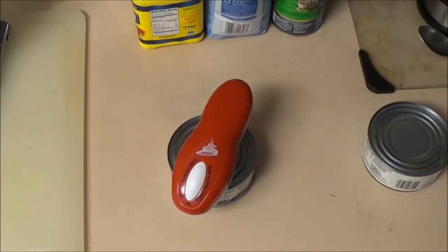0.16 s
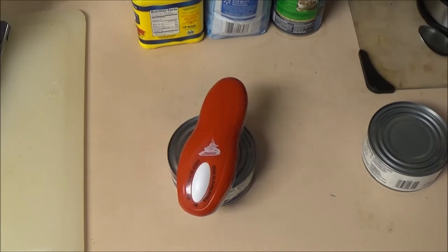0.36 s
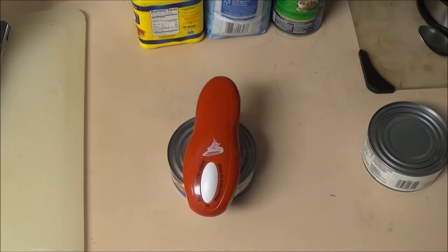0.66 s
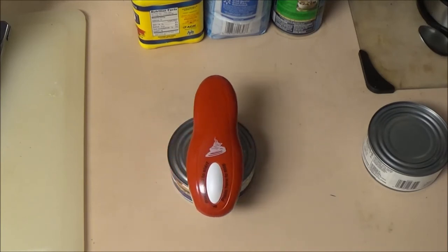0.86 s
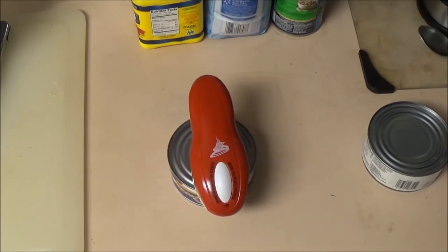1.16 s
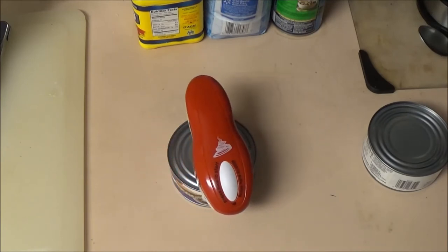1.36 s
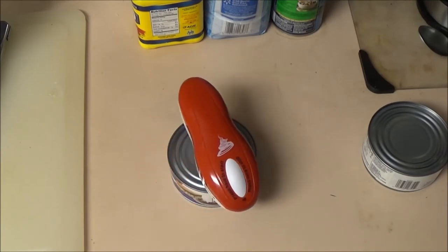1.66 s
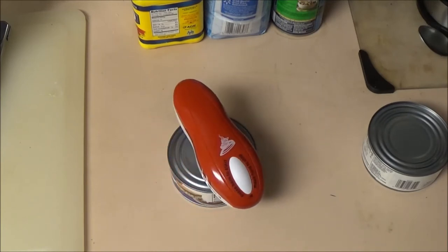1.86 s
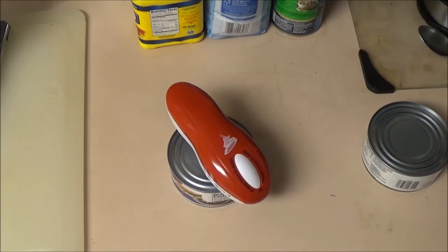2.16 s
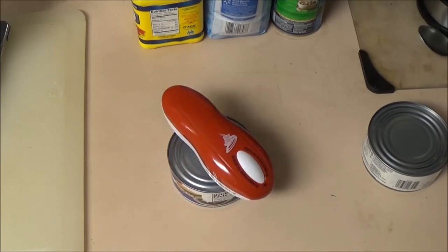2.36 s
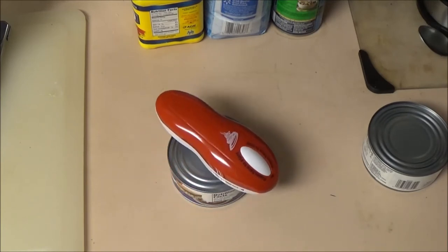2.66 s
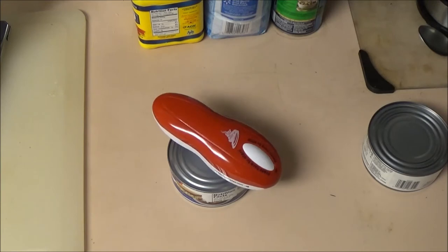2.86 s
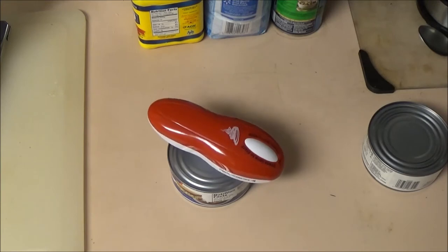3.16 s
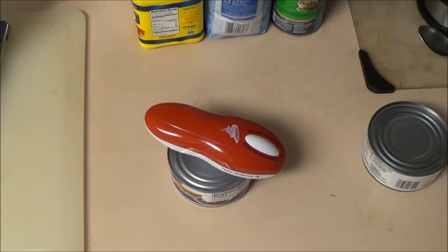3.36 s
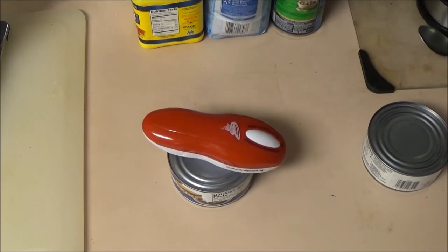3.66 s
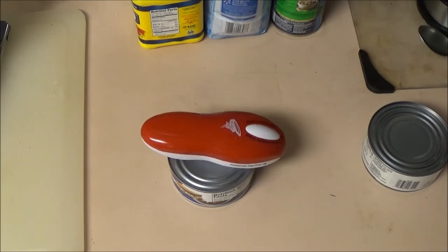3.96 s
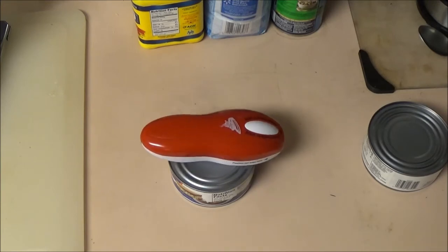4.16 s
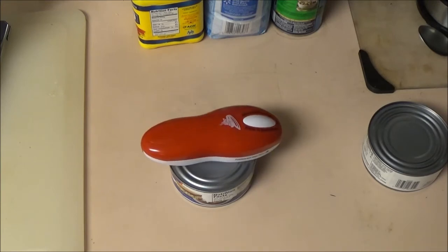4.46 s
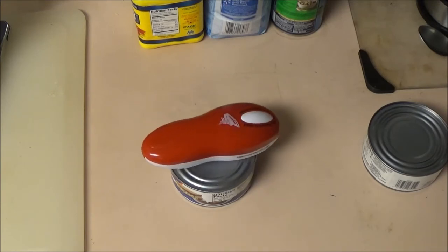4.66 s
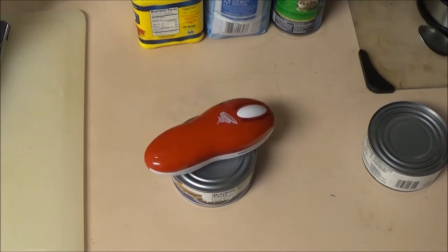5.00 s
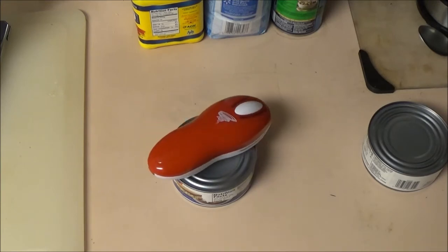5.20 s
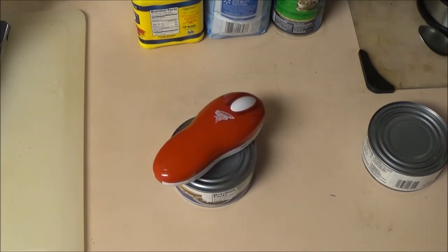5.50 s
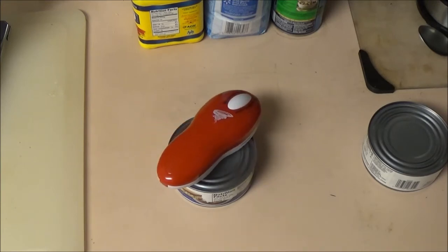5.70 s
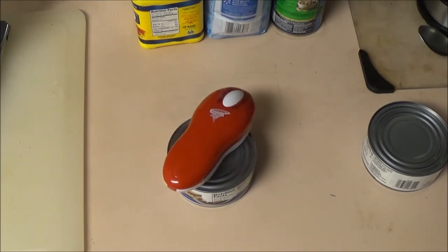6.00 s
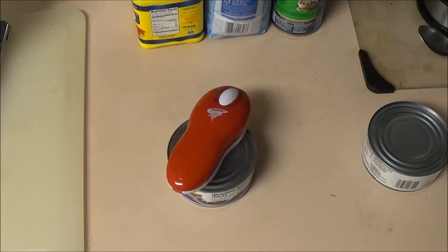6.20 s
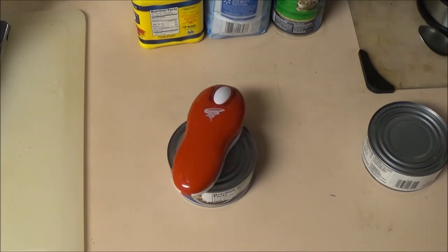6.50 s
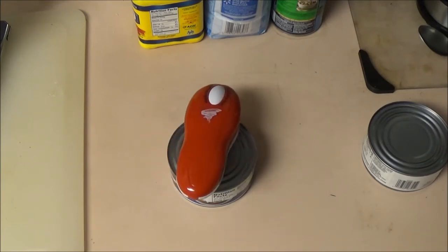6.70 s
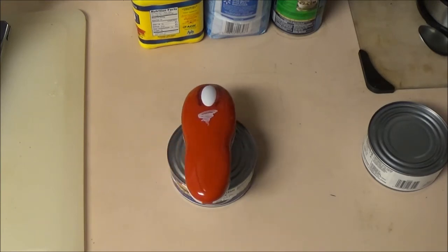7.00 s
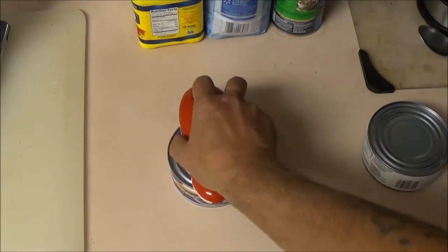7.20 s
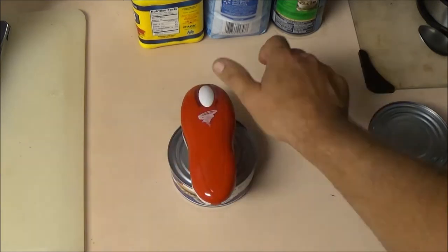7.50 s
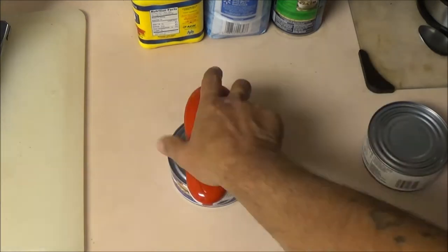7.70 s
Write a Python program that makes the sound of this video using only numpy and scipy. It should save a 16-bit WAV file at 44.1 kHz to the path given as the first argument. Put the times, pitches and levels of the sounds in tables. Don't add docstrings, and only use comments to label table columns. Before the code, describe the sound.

Close up on a kitchen counter, a small electric can opener grinds round a tin: a piercing, wavering gear whine with fine rasp and small dropouts. Early metallic knocks and a short scrape. Near seven seconds the lid pops and the pitch jumps, a hand slows it, then it reverses with a coarse swooping buzz and ends in plastic clicks. Thin, treble-heavy microphone, slight hard-room reflections.

```python
import sys
import numpy as np
from scipy import signal
from scipy.fft import rfft, irfft
from scipy.io import wavfile
from scipy.ndimage import uniform_filter1d

SR = 44100
rng = np.random.default_rng(int(sys.argv[2]) if len(sys.argv) > 2 else 0)


def to_wav(s):
    ch = np.atleast_2d(s).T
    pcm = np.round(np.clip(ch, -1, 1) * 32767)
    wavfile.write(sys.argv[1], SR, pcm.astype(np.int16))


def gain_from_db(level_db):
    decades = np.asarray(level_db, float) / 20
    return 10 ** decades


N = 346185
TIME = np.arange(N) / SR
FREQ = np.fft.rfftfreq(N, 1 / SR)
TAU = 2 * np.pi
STOP_S = 7.725


def cutting():
    # start in seconds, grip (-0.8..2.5), level in dB.
    effort = [(0, 2.5, 1.5), (.5, 0.93, 1.5), (.85, -0.4, 0.5), (1.15, 0.5, 0), (1.4, 1.23, 0.5),
              (1.75, 0, -0.5), (2.0, -0.63, 2), (2.55, -0.8, 1), (3.1, 1.2, -0.5), (3.5, -0.5, 2),
              (3.9, -0.54, 0.5), (4.55, 1.37, 1.5), (4.8, 1.5, 0), (5.3, 0.85, 0), (5.7, -0.14, 1),
              (6.35, 0, 1.5), (6.7, -0.36, 1), (7.3, -0.5, 2)]
    speed_hz, mean_turns, gear_turns, turns, seat = motor()
    grip, level_db = curve(effort)
    freed = np.interp(TIME, [6.945, 6.96, 7.25, 7.26], [0, 1, 1, .3])
    gear_phase = TAU * (.10003 * mean_turns + 0.3)
    load_gain = gain_from_db((0.57 + 1.8 * freed) * np.cos(gear_phase))
    out = gain_from_db(-15.5) * load_gain * pinion_whine(turns, gear_turns, seat, grip, level_db, freed)
    out += tooth_rasp(turns, grip, level_db)
    out += nicked_tooth(mean_turns, speed_hz)
    out += creeping_tin()
    return body(out * np.interp(TIME, [7.312, 7.322], [1, 0]))


def motor():
    # time in seconds, speed in turns per second.
    cut_speed = [(0.0, 427.5), (0.33, 445.5), (1.458, 422.2), (1.468, 418.1), (2.343, 448.0),
                 (2.678, 444.9), (2.776, 433.7), (2.891, 443.8), (4.031, 415.5), (5.163, 441.0),
                 (5.77, 411.9), (6.469, 424.5), (6.521, 401.9), (6.668, 403.7), (6.908, 435.4),
                 (6.942, 425.0)]
    # time in seconds, speed in turns per second.
    brake_speed = [
        (6.975, 488.9),
        (7.122, 497.7),
        (7.135, 473.8),
        (7.257, 444.9),
        (7.26, 416.6),
        (7.33, 400.4),
    ]
    wobble = [
        (0.0014, 0.0443, 0.119),
        (0.01, 0.0098, -0.149),
        (0.02, 0.0023, 0.26),
        (0.04286, 0.0109, -0.199),
        (0.1, 0.0049, 0.114),
    ]
    # start in seconds, length in seconds, tooth-rate change in dB,
    # twice-rate change in dB, speed change in turns per second.
    seated = [(0, 0.54, 3.5, 1.5, 7), (0.552, 0.29, -1, 6.5, 1.23), (0.872, 0.19, -1, 2.5, -9.5),
              (1.194, 0.53, 5.5, 3, 2.5), (1.869, 0.29, 5.5, 3, 10.5), (2.158, 0.2, 0.5, 4.5, -3),
              (2.418, 0.21, -3, 1.5, -4), (2.618, 0.33, -2.5, 3, 3), (3.06, 0.2, 6, 4.5, -2.5),
              (3.526, 0.52, 1.5, 3, 0.14), (4.62, 0.31, 1, 1.5, -0.18), (5.759, 0.25, -0.5, 1.8, -0.3),
              (6.57, 0.2, -0.5, 3.5, 0.6), (3.263, 0.26, 4, 1, -5), (4.118, 0.27, 4.5, 1.5, 5),
              (4.378, 0.245, 3.5, 1.5, 0.5), (4.899, 0.34, 0, 2, -3.5), (5.193, 0.22, 3, -0.5, 0.9),
              (5.399, 0.36, 0.5, 4.5, -0.3), (6.014, 0.24, -3.5, 3, -2.5), (6.244, 0.3, -0.5, 3.5, -0.4),
              (6.796, 0.15, -3.5, -1, -2.0), (7.186, 0.085, -4, -1, -1)]
    seat = sum(np.outer(change, (TIME >= s) & (TIME < s + length)) for s, length, *change in seated)
    seat = uniform_filter1d(seat, SR // 200)
    drag_hz = curve(cut_speed + brake_speed)[0] + seat[2]
    speed_hz = drag_hz
    for _ in range(3):
        mean_turns = np.cumsum(speed_hz) / SR
        sway = sum(share * np.cos(TAU * (ratio * mean_turns + start)) for ratio, share, start in wobble)
        speed_hz = drag_hz + speed_hz * sway
    turns = np.cumsum(speed_hz * (1 + 0.001158 * walk(90))) / SR
    return speed_hz, mean_turns, wobble[3][0] * mean_turns, turns, seat


def pinion_whine(turns, gear_turns, seat, grip, level_db, freed):
    # multiple of motor speed, level in dB.
    lines_db = [(3, -67), (5, -54), (6, -55), (7, -45), (8, -52.5), (9, -35.5), (10, -28), (11, -31.5),
                (12, -40.5), (13, -35), (14, -39), (15, -39.5), (16, -37), (17, -30.5), (18, -30),
                (19, -27.5), (20, -18), (21, -22), (22, -29.5), (23, -35), (24, -35), (25, -32.5),
                (26, -43), (27, -29), (28, -28), (29, -27.5), (30, -26), (31, -27.5), (32, -44), (33, -42),
                (34, -35)]
    freed_db = {7: -10, 22: 6, 27: -6, 28: -9, 29: -7, 30: -8, 31: -7}
    beat = TAU * gear_turns + walk(0.98)
    shift, tooth_db, twice_db = line_shifts(gear_turns, seat, grip, level_db)
    flicker = 1.7 * np.tanh(3 * walk(20))
    phase_blur = .22 * walk(700)
    alternate = np.exp(1j * np.pi * turns)
    slow = slice(None, None, 32)
    lines = 0
    for order, db in lines_db:
        flutter_db = 1.9 * np.cos(TAU * rng.random() + beat[slow])
        flutter_db += (1.8 if order < 17 else 1.1) * np.roll(flicker, order * SR // 4)[slow]
        if order in (10, 20):
            flutter_db *= .35
        flutter_db += freed_db.get(order, 0) * freed[slow]
        if order in (9, 11):
            flutter_db += 3.5 * np.tanh(3 * (np.cos(2 * beat[slow] + order) + walk(30)[slow]))
        gain = np.interp(TIME, TIME[slow], gain_from_db(db + shift[order][slow] + flutter_db))
        phase = TAU * (order * turns + 0.53 * rng.random())
        phase += 0.037 * (alternate * np.exp(1j * order)).imag + min(order / 27, 1) ** 3 * phase_blur
        lines = lines + gain * np.cos(phase)
    skirt = gain_from_db(-13 + twice_db) * walk(900) * np.cos(20 * TAU * turns)
    skirt += gain_from_db(-24.0 + tooth_db) * walk(500) * np.cos(10 * TAU * turns)
    return unit(lines) + skirt


def line_shifts(gear_turns, seat, grip, level_db):
    # multiple of motor speed, swing in dB,
    # loudest at share of sweep, dB per unit grip.
    aim = [(3, 7, 0.34, 5.5), (5, 1.5, 0.32, 0.5), (6, 2.5, 0.034, 2), (7, 7, 0.85, 0.5),
           (8, -0.5, 0.06, 2), (9, 1.4, 0.56, 1.5), (10, 1.36, 0.12, 0.5), (11, 2, 0.34, 2),
           (12, 1.5, 0.43, 0.5), (13, 2, 0.56, 1), (14, 4, 0.68, -1.5), (15, 3, 0.67, 1.5),
           (16, 6.5, 0.28, 5.5), (17, 4, 0.25, 3.5), (18, 4, 0.35, 3), (19, 2, 0.54, -2.5),
           (20, 4.5, 0.43, 3), (21, 4, 0.45, 1.4), (22, 3, 0.36, 2), (23, 8, 0.71, 2.2), (24, 2, 0.39, -4),
           (25, 1, 0.34, 3.5), (26, 14, 0.81, 0.4), (27, 2, 0.67, -1.5), (28, 2, 0.83, -2.5),
           (29, 5.5, 0.83, 1), (30, 3.5, 0.66, -9), (31, 4, 0.86, 0), (32, 8, 0.93, -2), (33, -3, 0.45, -6),
           (34, 3, 0.54, 3.5)]
    # start in seconds, length in seconds.
    parted = [(.338, .024), (.383, .036), (.44, .024), (.494, .045), (.638, .022), (.691, .02),
              (.745, .033), (1.096, .03), (1.17, .015), (1.272, .012), (1.317, .012), (1.524, .012),
              (1.685, .012), (1.766, .024), (2.116, .018), (2.143, .018), (2.377, .021), (2.481, .027),
              (2.511, .015), (2.541, .036), (2.604, .015), (2.712, .012), (3.322, .024), (5.202, .015),
              (5.786, .012), (6.178, .057), (6.381, .012), (6.414, .027), (6.477, .018), (6.51, .015),
              (6.558, .021)]
    # start in seconds, length in seconds.
    jammed = [(.539, .027), (1.215, .018), (1.266, .015), (1.541, .012), (1.694, .024), (1.727, .054),
              (1.784, .018), (2.002, .03), (2.161, .021), (2.248, .063), (2.332, .027), (2.706, .015),
              (2.73, .012), (3.55, .045), (3.631, .015), (3.691, .021), (3.831, .018), (3.888, .018),
              (3.939, .021), (4.014, .012), (4.056, .024), (4.442, .015), (6.007, .024), (6.223, .012),
              (6.31, .012), (6.543, .015), (6.576, .021), (6.845, .021), (6.896, .012), (6.917, .012),
              (7.163, .015), (7.235, .015), (7.259, .012)]
    shift = {order: level_db + facing(swing_db, share) + grip_db * grip
             for order, swing_db, share, grip_db in aim}
    gear_beat = np.cos(TAU * (gear_turns - .2)) * np.sign(seat[0])
    chatter_db = 1.3 * np.tanh(3 * (gear_beat + .55 * walk(25) + .2))
    shift[10] = shift[10] + seat[0] + 0.16 * chatter_db - 11 * gaps(jammed)
    shift[20] = shift[20] + seat[1] + chatter_db - 11 * gaps(parted)
    shift[9] = shift[9] - 0.28 * seat[0]
    shift[11] = shift[11] - 0.38 * seat[0]
    return shift, shift[10], shift[20]


def tooth_rasp(turns, grip, level_db):
    # frequency in Hz, density in dB per Hz.
    rasp_spectrum = [(290, -96), (500, -28.5), (667, -48), (970, -39), (1650, -19), (2230, -47),
                     (3110, -10.5), (3440, -29), (4590, -5.5), (6580, -8.5), (8650, 7.5), (9840, -4.5),
                     (12000, 11), (13900, -1), (15600, 0.5)]
    pulse = 1 + 0.34 * np.cos(TAU * turns) + 0.6 * np.cos(np.pi * turns)
    rasp = unit(colour(pulse * rng.standard_normal(N), rasp_spectrum))
    low_db = -20 + level_db + facing(0.84, 0.55) + 0.72 * grip
    high_db = -18 + level_db + facing(1.66, 0.55) + 0.37 * grip
    top_db = -32.5 + facing(17.0, 0.41)
    out = gain_from_db(low_db) * band(rasp, 290, 12260) + gain_from_db(high_db) * band(rasp, 9930, 15230)
    return out + gain_from_db(top_db) * band(rasp, 14100, 20000)


def nicked_tooth(mean_turns, speed_hz):
    ticks_per_turn, ring_hz = .10003, 14730
    since_s = ((ticks_per_turn * mean_turns - 0.10) % 1) / (ticks_per_turn * speed_hz)
    tick_db = np.interp(TIME, [0, 2.0, 3.5, 5.0, 7.3], [-9, -9, -5, 0, 1])
    tick = gain_from_db(tick_db) * np.exp(-since_s / .001)
    grit = tick * rng.standard_normal(N)
    ring = tick * np.exp(-since_s / .0004) * np.sin(TAU * ring_hz * since_s)
    return gain_from_db(-6) * band(.3 * grit + 1.3 * ring, 13500, 17000) + gain_from_db(-16) * band(grit, 9000, 13200)


def creeping_tin():
    # time in seconds, frequency in Hz.
    creep_low = [(0, 563), (.65, 620), (1.5, 495), (2.0, 562), (2.5, 500), (3.3, 580), (4.6, 591),
                 (5.18, 470), (5.27, 470), (5.29, 600), (5.4, 620), (5.5, 560), (6.0, 490), (6.3, 510),
                 (6.6, 430), (7.0, 480), (7.25, 560), (7.33, 550)]
    # time in seconds, frequency in Hz.
    creep_high = [(4.3, 750), (4.85, 1070), (4.9, 880), (5.25, 910), (5.45, 870), (5.75, 815), (6.0, 845),
                  (6.4, 930), (6.55, 970), (6.6, 785), (7.3, 770)]
    high_db = np.interp(TIME, [4.25, 4.35, 5.45, 5.6, 5.75, 6.4, 6.55, 6.6],
                        [-100, -66, -60.5, -75, -64, -63, -55, -68])
    out = np.zeros(N)
    for path, db in [(creep_low, -72), (creep_high, high_db)]:
        turns = np.cumsum(curve(path)[0] * (1 + .014 * walk(12))) / SR
        out += gain_from_db(db - 2 + 4 * walk(14)) * np.cos(TAU * turns)
    return out


def running_back():
    # time in seconds, tooth whine in dB, twice-rate whine in dB, rasp in dB.
    back_effort = [(7.328, -35, -60, -18.5), (7.372, -33, -28, -19), (7.43, -37, -32, -27),
                   (7.50, -37.5, -31, -21), (7.545, -32, -23, -17.5), (7.59, -36, -28, -18.5),
                   (7.62, -29, -43, -17.5), (7.665, -36, -48, -18.5), (7.73, -42, -52, -24)]
    # time in seconds, speed in turns per second.
    back_speed = [(7.328, 760), (7.365, 530), (7.395, 310), (7.42, 252), (7.455, 268), (7.5, 335),
                  (7.545, 470), (7.58, 590), (7.6, 605), (7.65, 590), (7.73, 310)]
    # frequency in Hz, density in dB per Hz.
    back_spectrum = [(410, -45), (700, -34), (994, -23), (1290, -35), (1450, -16.5), (2110, -19.5),
                     (3160, -14), (4090, -12.5), (6200, -4), (7160, -0.5), (8150, 3), (9650, -4),
                     (10700, 1.5), (13500, -5.5), (15600, -3)]
    # frequency in Hz, width in Hz, level in dB.
    shell_rings = [(7640, 150, -32), (8080, 250, -33), (10800, 260, -36), (11650, 250, -36)]
    speed_hz = curve(back_speed)[0]
    tooth_db, twice_db, rasp_db = curve(back_effort)
    turns = np.cumsum(speed_hz * (1 + .026 * walk(260))) / SR
    mesh = 10 * TAU * turns + .45 * np.sin(TAU * turns)
    whine = gain_from_db(tooth_db + 3 * walk(110)) * np.cos(mesh)
    whine += gain_from_db(twice_db + 3 * walk(110)) * np.cos(2 * mesh)
    whine += gain_from_db(twice_db - 3 + 3 * walk(90)) * np.cos(3 * mesh) * (30 * speed_hz < 12500)
    pulse = (1 + 0.58 * np.cos(TAU * turns)) * gain_from_db(0.38 * walk(100))
    rasp = colour(pulse * rng.standard_normal(N), back_spectrum)
    rings = sum(gain_from_db(db + 17 + 3 * walk(40)) * unit(band(rasp, hz - width / 2, hz + width / 2))
                for hz, width, db in shell_rings)
    start = np.interp(TIME, [7.318, 7.33], [0, 1])
    coast = gain_from_db(np.interp(TIME, [STOP_S, STOP_S + 0.028], [0, -18.5]))
    slap = sum(gain_from_db(db) * np.exp(-np.abs(TIME - s) / 0.0022) * (TIME > s)
               for s, db in [(7.329, 0), (7.345, -1)])
    slap = band(slap * rng.standard_normal(N), 6840, 9500)
    return body((1.35 * whine + gain_from_db(rasp_db) * (0.99 * unit(rasp) + rings)) * start * coast + slap)


def knocks():
    # start in seconds, peak in dB, ring in Hz, T60 in seconds.
    tin_knocks = [(0.163, -27, 3150, 0.03), (0.208, -32, 2440, 0.037), (0.297, -29, 2470, 0.025),
                  (1.037, -40, 960, 0.03), (1.151, -48, 1340, 0.03), (1.166, -22.5, 1630, 0.015),
                  (1.171, -28, 1070, 0.024), (6.95, -23, 1508, 0.053), (6.952, -28, 3320, 0.028),
                  (6.957, -21, 2220, 0.015), (7.172, -29, 1677, 0.022), (7.555, -33, 1450, 0.019),
                  (7.648, -35, 1020, 0.048)]
    # start in seconds, peak in dB, ring in Hz, T60 in seconds.
    button_clicks = [(7.7926, -28, 3700, 0.021), (7.7964, -26.5, 1510, 0.019), (7.8029, -32, 1430, 0.038),
                     (7.809, -26, 3800, 0.025), (7.8093, -25.5, 3620, 0.034), (7.822, -25, 4500, 0.026),
                     (7.8378, -27.5, 2700, 0.022)]
    # start in seconds, peak in dB.
    rocking = [(1.629, -65), (1.909, -51), (4.569, -80), (5.539, -49), (6.959, -60), (7.261, -54)]
    out, thud = np.zeros(N + SR), np.zeros(N + SR)
    t = np.arange(SR // 8) / SR
    for s, db, hz, t60 in tin_knocks + button_clicks:
        ring = 0.7 * np.sin(TAU * hz * t)
        ring += 0.12 * np.sin(TAU * 1.4 * hz * t)
        ring += 0.3 * np.sin(TAU * 0.67 * hz * t)
        crack = band(rng.standard_normal(len(t)), 1500, 5500) * np.exp(-t / .006)
        ring += (1.3 if s < STOP_S else .5) * crack
        i = int(s * SR)
        out[i:i + len(t)] += gain_from_db(db) * ring * np.exp(-np.log(1000) * t / max(t60, .005))
    for s, db in rocking:
        i = int(s * SR)
        thud[i:i + len(t)] += gain_from_db(db) * np.sin(TAU * 140 * t) * np.exp(-t / 0.004)
    scrape = np.interp(TIME, [.155, .165, .23, .33], [0.13, 1, 0.94, 0.084])
    scrape = scrape * gain_from_db(-34.5 + 2 * walk(140)) * rng.standard_normal(N)
    return band(out[:N], 760, 17000) + band(scrape, 1320, 5200) + thud[:N]


def body(x):
    # frequency in Hz, width in Hz, level in dB.
    resonances = [(3310, 170, -0.5), (3700, 150, 3.5), (4117, 136, 7.5), (4442, 290, 4), (4676, 230, 4.5),
                  (5180, 200, 3.5), (5630, 370, 6), (6240, 130, 6), (7400, 84, -9), (7650, 710, 14),
                  (8170, 520, 0.5), (8330, 57, 5.5), (8570, 103, -23), (10000, 540, -8), (9960, 410, 14.5),
                  (10820, 120, 6.5), (11680, 220, 6), (12030, 470, 11.5), (12850, 360, 13),
                  (15270, 210, 12)]
    power = sum(gain_from_db(2 * db) / (1 + (2 * (FREQ - hz) / width) ** 2) for hz, width, db in resonances)
    trend = uniform_filter1d(power, int(900 * N / SR))
    return irfft(rfft(x) * np.sqrt(power / trend), N)


def echo(x, t60):
    t = np.arange(int(.4 * SR)) / SR
    tail = rng.standard_normal(len(t)) * np.exp(-np.log(1000) * t / t60) * (t > .002)
    return signal.fftconvolve(x, tail / np.sqrt(np.sum(tail ** 2)))[:N]


def kitchen():
    # frequency in Hz, level in dB.
    hum_lines = [
        (236.9, -79.5),
        (479.1, -69.5),
    ]
    # frequency in Hz, density in dB per Hz.
    room_spectrum = [(25, -17), (200, -16.5), (400, -12.5), (700, -12), (1000, -0.5), (1500, -2), (4000, 4),
                     (9000, -2.5), (15700, -5)]
    hum = sum(np.sqrt(2) * gain_from_db(db + 0.5 * walk(11.0)) * np.cos(TAU * hz * TIME) for hz, db in hum_lines)
    return hum + gain_from_db(-43 + walk(9)) * unit(colour(rng.standard_normal(N), room_spectrum))


def unit(x):
    return x / np.sqrt(np.mean(x ** 2))


def curve(table):
    s, *columns = np.transpose(table)
    return [np.interp(TIME, s, c) for c in columns]


def colour(x, points):
    hz, db = np.transpose(points)
    return irfft(rfft(x) * gain_from_db(np.interp(np.log(FREQ + 1), np.log(hz), db)), N)


def band(x, lo_hz, hi_hz):
    return signal.sosfilt(signal.butter(4, [lo_hz, hi_hz], "bandpass", fs=SR, output="sos"), x)


def walk(rate_hz):
    k = int(SR / rate_hz)
    held = np.repeat(rng.standard_normal(N // k + 1), k)
    return 1.278 * uniform_filter1d(uniform_filter1d(held, k), k)[:N]


def facing(swing_db, share):
    return swing_db * np.cos(TAU * (TIME / 7 - share))


def gaps(table):
    inside = np.zeros(N)
    for s, length in table:
        inside[int(s * SR):int((s + length) * SR)] = 1
    return uniform_filter1d(inside, SR // 300)


def scene():
    opener = cutting() + running_back() + knocks()
    mid = opener + gain_from_db(-15) * echo(opener, .15) + kitchen()
    side = gain_from_db(-15.0) * echo(band(opener, 1800, 13700), 0.59)
    side += gain_from_db(-57.5) * band(rng.standard_normal(N), 1700, 15000)
    return np.array([mid + side, mid - side])


def band_limit(x):
    return signal.sosfilt(signal.butter(12, 17100, fs=SR, output="sos"), x)


def record(dry):
    top_cut = signal.ellip(10, .2, 80, 15730, fs=SR, output="sos")
    dry = signal.sosfilt(top_cut, dry)
    bent = np.tanh(1.6 * dry) / 1.6 - dry
    treble = signal.butter(4, [3000, 15000], "bandpass", fs=SR, output="sos")
    return band_limit(dry + signal.sosfiltfilt(treble, bent))


dry = scene()
out = record(dry)
to_wav(out)
```